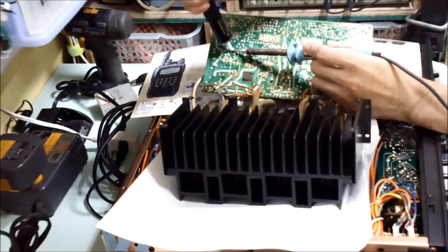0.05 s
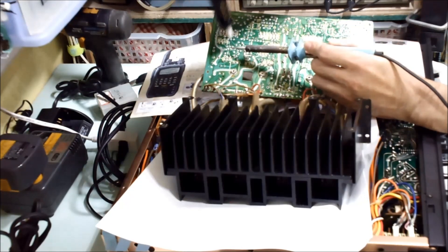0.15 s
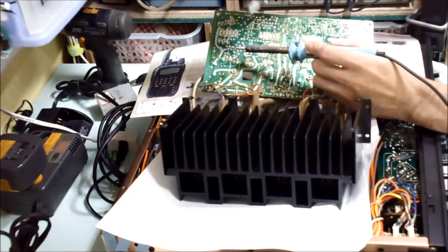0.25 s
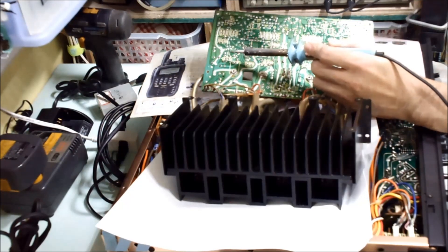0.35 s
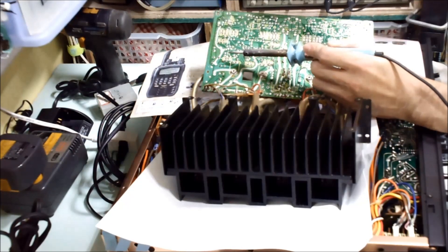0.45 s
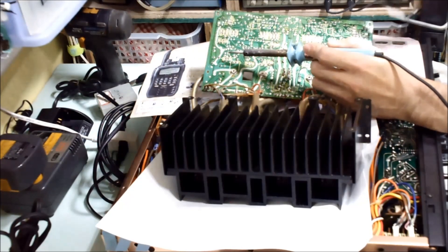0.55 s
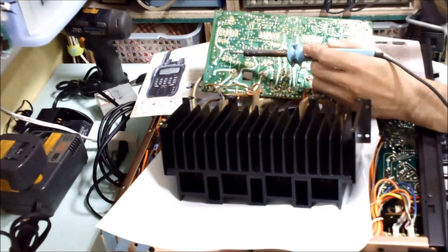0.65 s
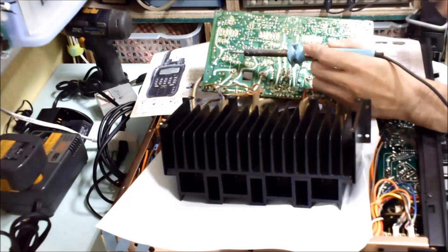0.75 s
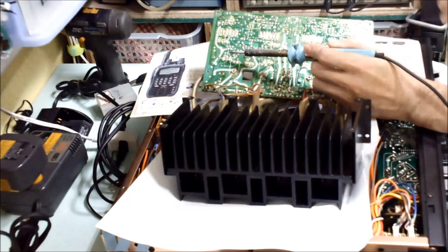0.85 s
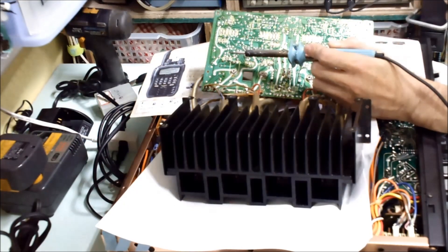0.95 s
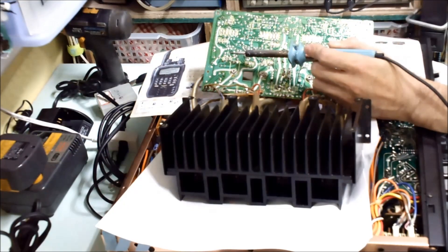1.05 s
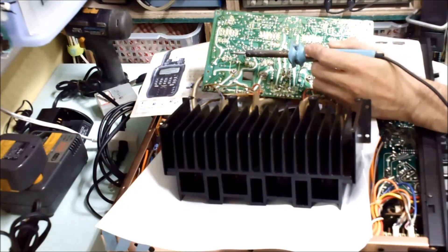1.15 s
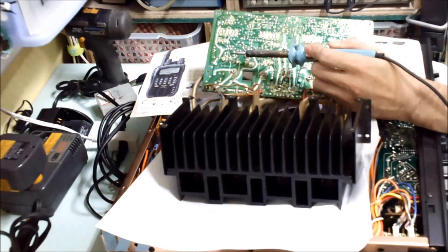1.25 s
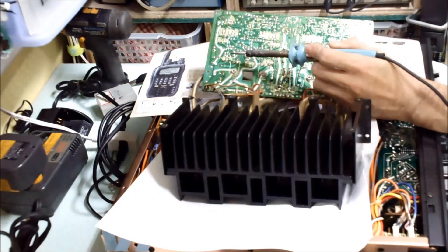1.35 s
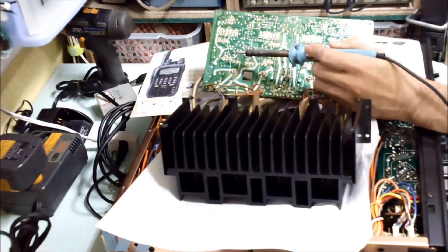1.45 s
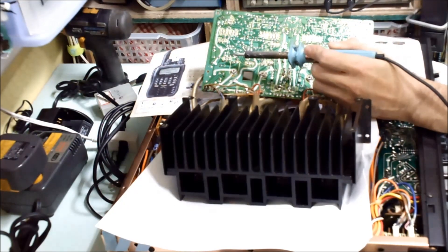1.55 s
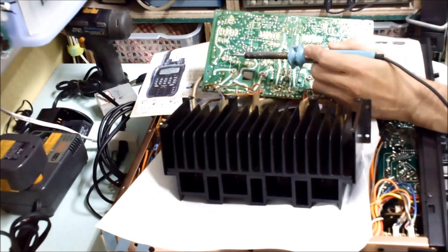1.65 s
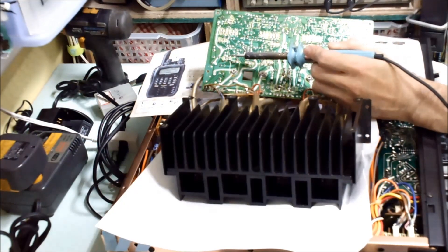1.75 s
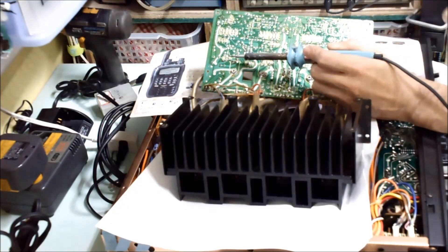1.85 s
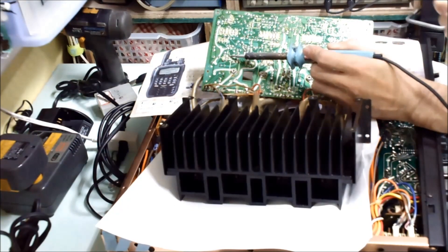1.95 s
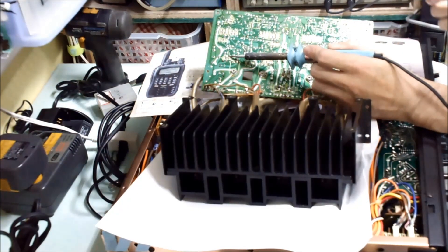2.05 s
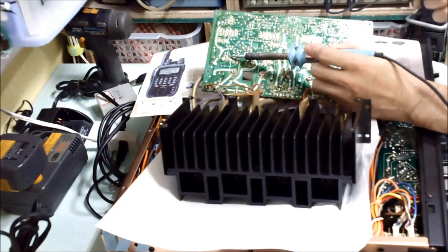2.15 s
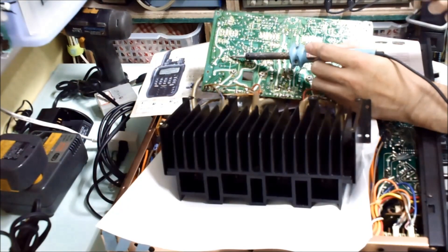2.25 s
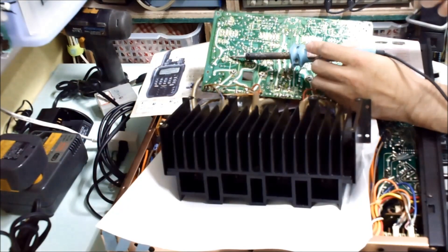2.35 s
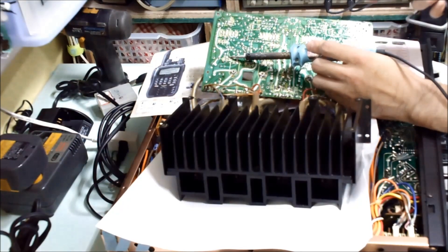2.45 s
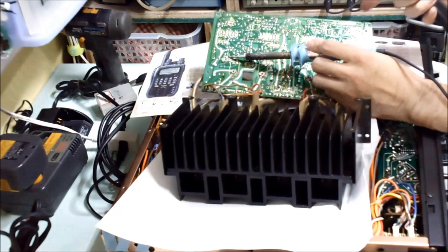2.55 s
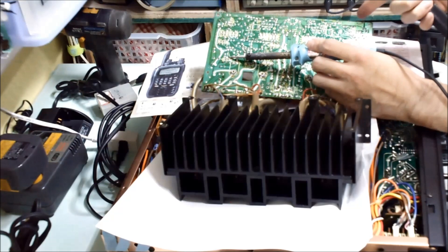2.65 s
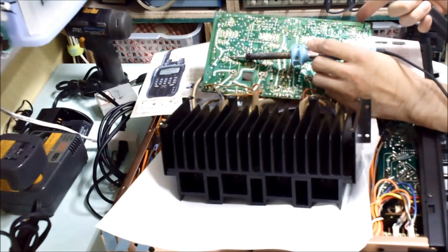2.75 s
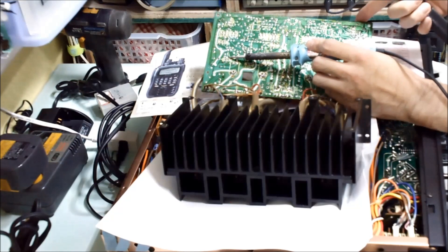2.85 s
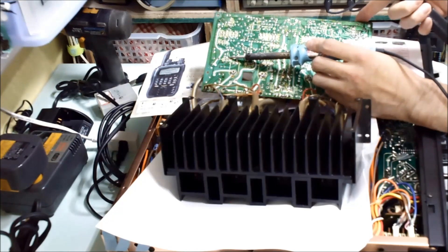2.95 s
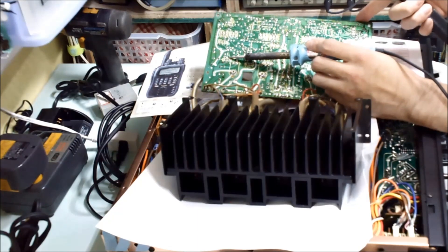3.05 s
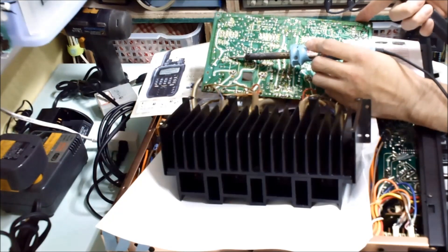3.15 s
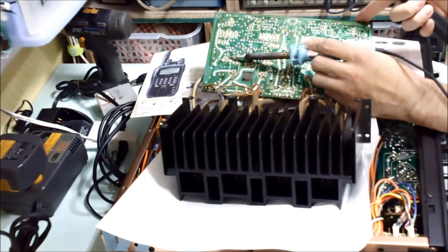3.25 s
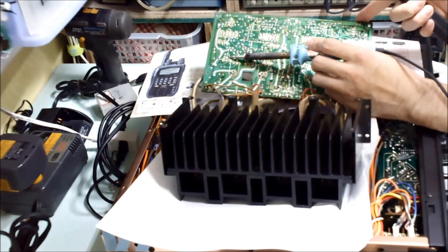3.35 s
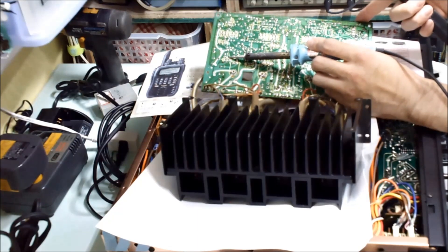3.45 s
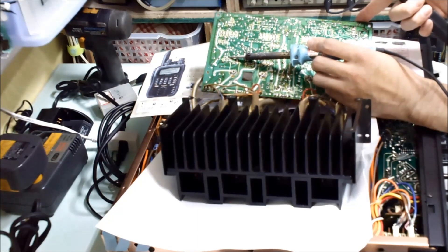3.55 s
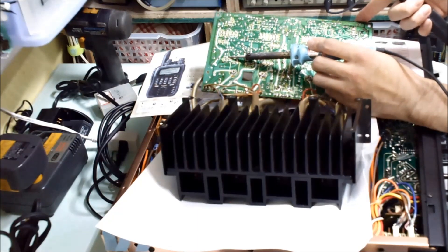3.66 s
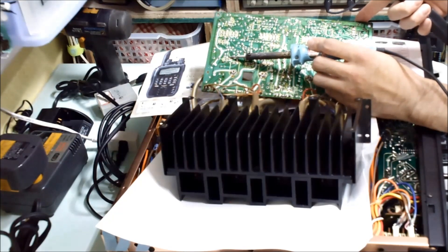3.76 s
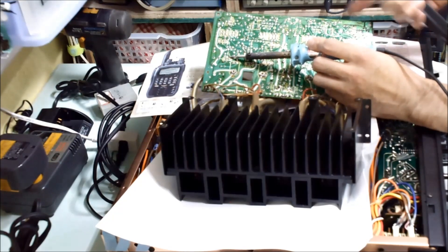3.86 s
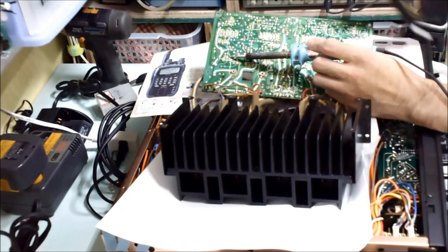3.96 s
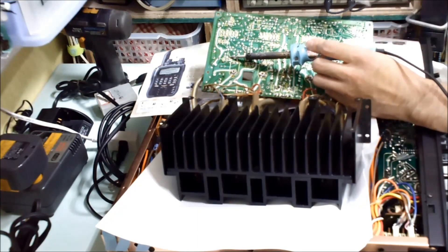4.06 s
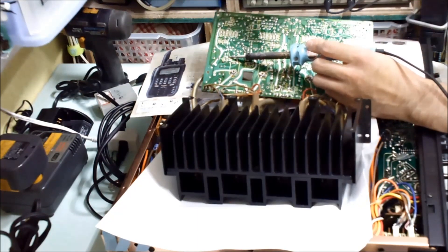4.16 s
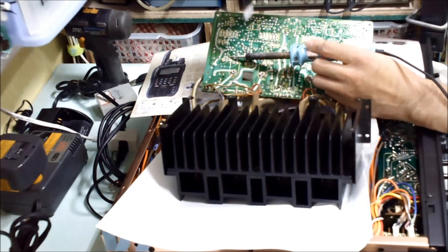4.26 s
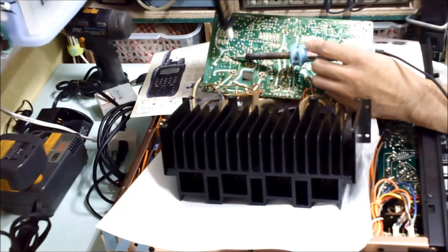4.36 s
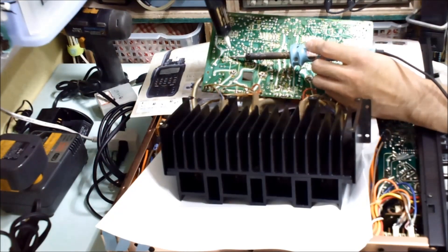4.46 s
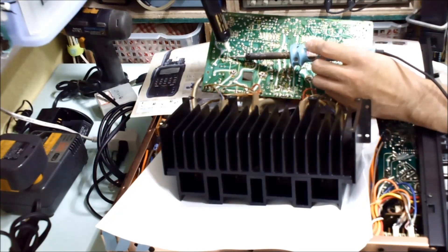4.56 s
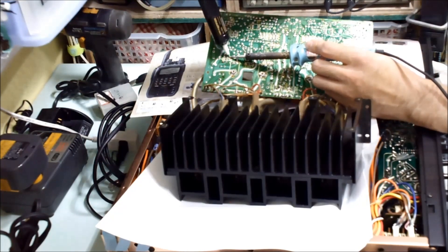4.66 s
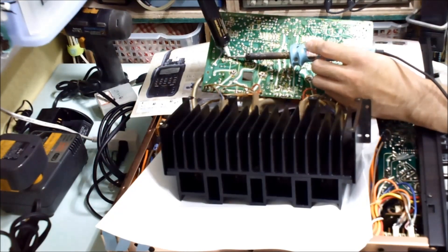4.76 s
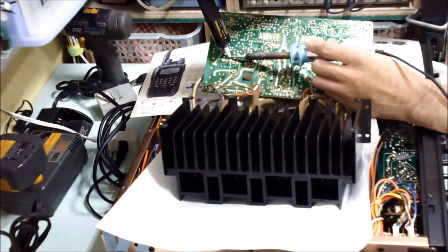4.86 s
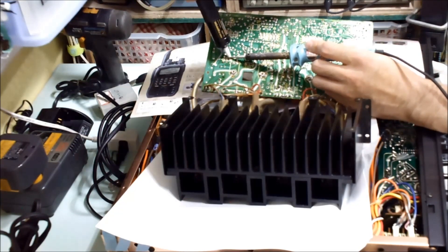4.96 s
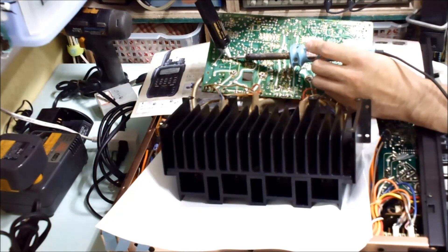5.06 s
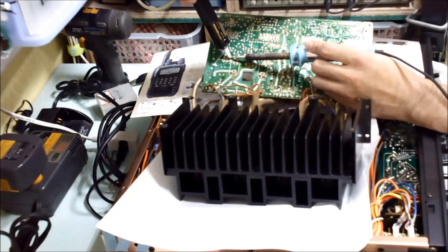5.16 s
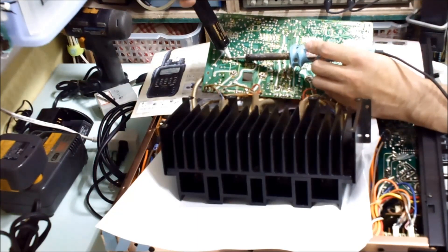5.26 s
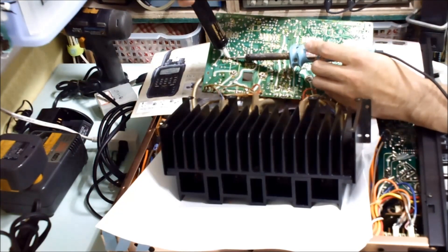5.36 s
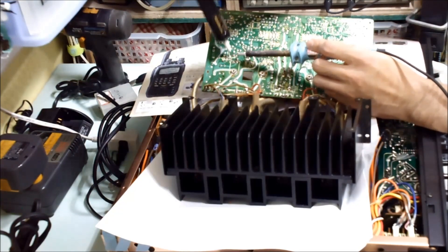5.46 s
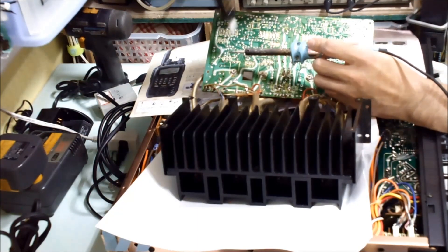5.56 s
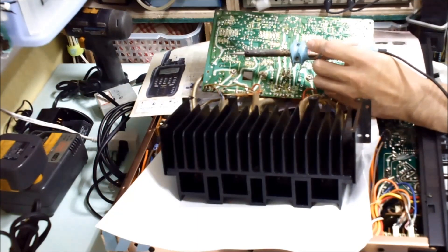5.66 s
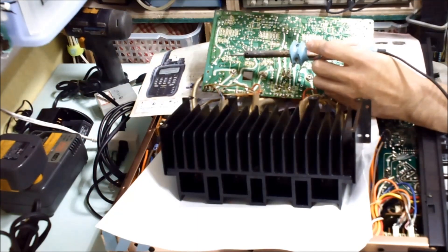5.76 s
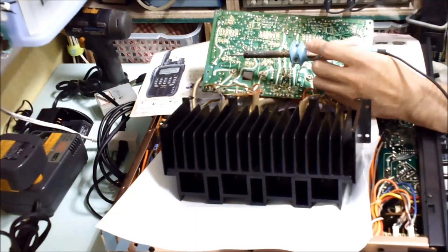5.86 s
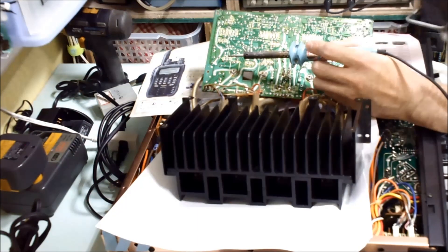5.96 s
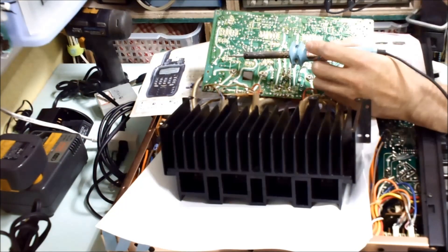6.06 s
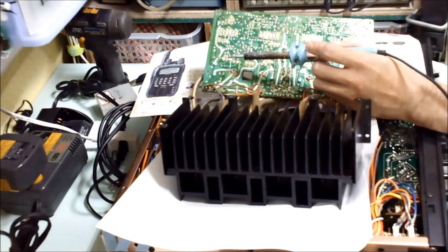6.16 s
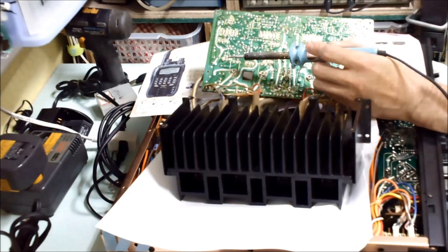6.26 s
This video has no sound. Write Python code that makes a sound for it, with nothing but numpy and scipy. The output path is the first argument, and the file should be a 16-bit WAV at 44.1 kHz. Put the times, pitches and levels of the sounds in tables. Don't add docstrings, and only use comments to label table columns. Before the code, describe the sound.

A spring-loaded hand pump fires with a hard snap, is pushed back until it latches and knocks the bench, then fires again after light taps and rubbing.

```python
import sys
import numpy as np
from scipy import signal
from scipy.fft import rfft, irfft
from scipy.io import wavfile
from scipy.ndimage import uniform_filter1d

SR = 44100
rng = np.random.default_rng(int(sys.argv[2]) if len(sys.argv) > 2 else 0)


def field_ratio(decibels):
    return 10 ** (np.asarray(decibels, dtype=float) / 20)


def log_audio(samples):
    frames = np.atleast_2d(samples).T
    limited = np.clip(frames, -1, 1)
    pcm = np.round(limited * 32767).astype(np.int16)
    wavfile.write(sys.argv[1], SR, pcm)


N = 277830

# (frequency [Hz], density [dB per Hz])
ROOM_SPECTRUM = [(12, -33), (20, -0.5), (44, 3), (70, 0.5), (248, -13), (485, -21.5), (2320, -33),
                 (3340, -33), (3950, -31.5), (4420, -24.5), (5380, -33), (6360, -36.5), (7730, -36.5),
                 (14700, -38), (16000, -35)]
# (frequency [Hz], width [Hz], level over top hiss [dB])
WHINE_BAND = (7900, 150, -12.5)
# (offset [s], level over top hiss [dB], share sounding [0-1])
LENS_STEPS = [
    (.0156, 25, .65),
    (.0168, 24.5, .5),
    (.0204, 26.5, .85),
]
FRAME_S = 1 / 30

DUCK_DEPTHS_DB = [
    6,
    10.5,
]
FULL_GAIN_DB = -71
DUCK_HOLD_S, CLIMB_STEP_DB, CLIMB_STEP_S = 0.51, 4.5, 0.19
NEAR_DB, NEAR_WAIT_S, CREEP_S = 4, 0.88, 0.9

# (peak time [s], level [dB], rise [s], fall [s])
HAND_RUBS = [(.75, -70, .15, .1), (.88, -67, .12, .2), (1.02, -67.5, .1, .2), (1.15, -69.5, .15, 0.18),
             (1.31, -65, .25, .06), (1.93, -57, .02, .2), (2.43, -61, 0.19, .2), (2.81, -68, .2, .4),
             (3.05, -66, .3, .13), (3.98, -59, 0.036, 0.12), (5.2, -71, .3, .4), (5.45, -59.5, .05, .01)]
# (frequency [Hz], density [dB per Hz])
RUB_SPECTRUM = [(350, -44.5), (600, -18), (733, -14.5), (1360, -17), (1410, -19.5), (2100, -10.5),
                (3380, -13), (4190, 3.5), (4750, 1.5), (7270, -21), (12000, -31), (15600, -62),
                (22000, -120)]
# (peak time [s], level [dB], rise [s], fall [s])
SLEEVE_SWELL = [(4.28, -56, 0.13, 0.66)]
# (frequency [Hz], density [dB per Hz])
SLEEVE_SPECTRUM = [(500, -37), (900, -22.5), (3300, -18.5), (4100, -11.5), (4450, -6), (4580, 2.5),
                   (4720, -9), (5300, -16), (6800, -27.5), (12000, -36.5)]
# (peak time [s], level [dB], rise [s], fall [s])
LOW_BREATHS = [(1.3, -70, .06, .07), (1.41, -62.5, .03, 0.14), (1.55, -73, .15, .4), (1.74, -71, .25, .06)]
# (peak time [s], level [dB], rise [s], fall [s])
HIGH_BREATHS = [(1.55, -73, 0.17, .2), (1.71, -59, .17, .25)]
PUSH_START_S, PUSH_END_S = 1.385, 1.745

# (time [s], peak level [dB], tilt from dull to bright [dB])
BOARD_TAPS = [(0.043, -45.5, -8.5), (0.2438, -30, -4.5), (0.2614, -44, -1), (0.2835, -40.5, -1),
              (0.7378, -46.5, -2), (0.819, -56.5, -7.5), (0.8594, -58, -3), (1.0114, -48.5, 1.5),
              (1.2026, -46, 1), (1.3813, -52, 2), (2.115, -47.5, -0.5), (2.3477, -48, -1), (2.3686, -46, 1),
              (2.4656, -43, 1), (2.5492, -49, -1), (2.6207, -50, -1), (2.72, -47, 3.5), (2.7826, -48, 3.5),
              (2.853, -49, 2.5), (3.3189, -48, 4), (3.8434, -51, 2), (3.9866, -33, 1.5), (5.0808, -34, 3),
              (5.3585, -47, -3), (5.391, -50, -8.5), (5.4177, -43, -2), (5.5822, -42, -2.5),
              (5.5923, -43, -2.5), (5.6294, -53, -1), (5.7694, -62.5, -6.5)]
# (frequency [Hz], density [dB per Hz])
TAP_SPECTRUM = [(210, -46), (350, -14.5), (1340, -13.5), (2500, -11), (2710, -9.5), (3180, -14),
                (4670, 0.5), (6130, -16.5), (8440, -28.5), (9140, -35), (16000, -41)]
# (time [s], peak level [dB], frequency [Hz], t60 [s])
BARREL_POPS = [
    (.821, -58, 1150, .06),
    (1.6, -62, 1330, .05),
    (1.771, -46, 598, .09),
    (1.826, -50, 1130, .035),
]

# (time [s], level [dB], rise [s], t60 [s])
KNOCK_CONTACTS = [
    (1.878, -31.5, 0.012, 0.068),
    (1.8915, -23, 0.00035, 0.03),
    (1.8965, -33, 0.00069, 0.016),
    (1.903, -40.5, .003, 0.15),
]
# (frequency [Hz], density [dB per Hz])
KNOCK_SPECTRUM = [(180, -43), (300, -35), (584, 2.5), (1230, -9), (2000, 7.5), (2740, -14.5), (2980, -5.5),
                  (3130, -13), (4230, 1), (6000, -14), (16000, -45)]
# (frequency [Hz], level [dB], t60 [s])
KNOCK_RESONANCES = [(450, -10.5, .05), (572, -11, 0.1), (1580, -12, .04), (1980, -19, .07),
                    (3120, -13, 0.09), (4200, -12, .04)]
# (time [s], level [dB], rise [s], t60 [s])
LATCH_CONTACTS = [
    (1.7385, -29.5, 0.00057, 0.012),
    (1.7400, -22, 0.00032, 0.013),
    (1.744, -42, .002, 0.144),
    (1.764, -49.5, .004, .1),
]
# (frequency [Hz], density [dB per Hz])
LATCH_SPECTRUM = [(820, -59), (1400, -26.5), (1730, -21), (1960, -3.5), (2280, -24), (3300, -11),
                  (4000, -21), (4760, -0.5), (6330, -25), (8950, -22), (15100, -52), (16000, -50)]
# (frequency [Hz], level [dB], t60 [s])
LATCH_RESONANCES = [(2000, -4.5, 0.052), (3270, -14, .04), (4800, -3, .1), (4900, -9, .1), (6600, -24, .04)]

# (frequency [Hz], level [dB], t60 [s])
BENCH_RESONANCES = [(54, -48, .45), (82.5, -53.5, .15), (130.5, -42, 0.15), (184, -49.5, 0.091)]
RECOIL_LEVELS_DB = [
    -.5,
    -5,
]
# (release time [s], flight [dB], stop [dB], bounce [dB], after-rattle [dB])
PUMP_SHOTS = [
    (.1016, -1.5, -4, .5, 3.5),
    (5.4544, 1, 2, -2.5, -2),
]
# (time after release [s], level [dB], rise [s], t60 [s])
FLIGHT_CONTACTS = [
    (0, -28, .0011, .036),
    (.0021, -18.5, .0005, .04),
    (.0056, -23.5, .0004, .035),
    (.0098, -23, .0008, .022),
]
# (time after release [s], level [dB], rise [s], t60 [s])
STOP = (0.0126, -14, 0.0002, 0.0048)
BOUNCE = (0.014, -11, 0.0006, 0.027)
AFTER_RATTLE = (0.0225, -24, 0.0025, 0.115)
# (frequency [Hz], density [dB per Hz])
SHOT_SPECTRA = [
    [(120, -59), (200, -31.5), (373, -16), (683, -29), (821, -12), (986, -28), (1350, -6.5), (1560, -15.5),
     (3190, -12), (3760, -13.5), (4520, 0.5), (9930, -30), (10900, -25), (16000, -55)],
    [(120, -54.5), (200, -19), (623, -21.5), (791, -14.5), (1210, -25), (1370, -11), (2860, -16.5),
     (3130, -9.5), (3430, -14.5), (4680, 0), (7410, -17.5), (9230, -30.5), (11500, -29.5), (16000, -58)],
]
# (frequency [Hz], level [dB], t60 [s])
SHOT_RESONANCES = [
    [(782, -9, 0.087), (1346, -12, 0.043), (3200, -12, .04), (4145, -5, .07), (4400, -5.5, 0.065),
     (4823, -7.5, .1), (5560, -9.5, .06)],
    [(780, -17, 0.035), (1350, -9, 0.084), (2050, -15.5, .04), (4360, -10.5, .1), (4650, -5.5, 0.12),
     (4735, -7, 0.09), (5020, -8.5, .07), (5400, -5, .05)],
]


def rms_one(x):
    return x / np.sqrt(np.mean(x ** 2) + 1e-30)


def colour(x, spectrum):
    hz, db = np.transpose(spectrum)
    size = 8192
    bins_hz = np.arange(size // 2 + 1) * SR / size
    gain = field_ratio(np.interp(np.log(bins_hz + 1), np.log(hz), db))
    cepstrum = irfft(np.log(gain))
    cepstrum[1:size // 2] *= 2
    cepstrum[size // 2 + 1:] = 0
    response = irfft(np.exp(rfft(cepstrum)))
    return signal.oaconvolve(x, response / np.linalg.norm(response))[:N]


def ring(x, hz, t60_s):
    radius = field_ratio(-60 / (t60_s * SR))
    w = 2 * np.pi * hz / SR
    return signal.lfilter([0, np.sin(w)], [1, -2 * radius * np.cos(w), radius ** 2], x + 1e-18)


def band(x, low_hz, high_hz):
    return signal.sosfilt(signal.butter(2, [low_hz, high_hz], "band", fs=SR, output="sos"), x)


def drift(rate_hz):
    knots = rng.standard_normal(int(N / SR * rate_hz) + 2)
    return np.interp(np.linspace(0, len(knots) - 1, N), np.arange(len(knots)), knots)


def burst(time_s, db, rise_s, t60_s):
    out = np.zeros(N)
    start = round(time_s * SR)
    t = np.arange(min(N - start, SR // 2)) / SR
    out[start:start + len(t)] = field_ratio(db - 60 * t / t60_s) * np.minimum(t / rise_s, 1)
    return out


def swells(rows):
    t = np.arange(N) / SR
    out = np.zeros(N)
    for peak_s, db, rise_s, fall_s in rows:
        down_db = 20 * np.maximum((peak_s - t) / rise_s, (t - peak_s) / fall_s)
        out += field_ratio(db - down_db) * (down_db < 30)
    return out


def hold(start_s, end_s, attack_s, release_s):
    t = np.arange(N) / SR
    closed = np.maximum((start_s + attack_s - t) / attack_s, (t - end_s) / release_s)
    return field_ratio(-20 * np.clip(closed, 0, 5))


def rattle(grain_db):
    return rms_one(rng.standard_normal(N) * field_ratio(grain_db * drift(900)))


def blow(contacts, impact, spectrum, modes, modes_db, grain_db):
    force = rattle(grain_db) * sum(burst(*row) for row in contacts)
    impact_s, impact_db = impact
    force[round(impact_s * SR)] += field_ratio(impact_db)
    rings = sum(field_ratio(db + 3 * drift(200)) * ring(force, hz, t60_s) for hz, db, t60_s in modes)
    return colour(force, spectrum) + field_ratio(modes_db) * rings


def gain_control():
    under_db = np.zeros(N)
    for shot, depth_db in zip(PUMP_SHOTS, DUCK_DEPTHS_DB):
        since_s = np.arange(N) / SR - shot[0] - BOUNCE[0]
        steps = np.maximum(np.ceil((since_s - DUCK_HOLD_S) / CLIMB_STEP_S), 0)
        home = np.clip(1 - (since_s - DUCK_HOLD_S - NEAR_WAIT_S) / CREEP_S, 0, 1)
        under_db += (since_s > 0) * np.maximum(depth_db - CLIMB_STEP_DB * steps, NEAR_DB) * home
    return field_ratio(FULL_GAIN_DB - uniform_filter1d(under_db, size=600))


def lens_drive():
    clicks = np.zeros(N + SR)
    frames_s = np.arange(0, N / SR, FRAME_S)
    for offset_s, db, share in LENS_STEPS:
        level, sounding, jitter = rng.random((len(frames_s), 3)).T
        at = np.round((frames_s + offset_s + 0.0006 * (jitter - 0.5)) * SR).astype(int)
        clicks[at] += field_ratio(db + 8 * (level - 0.5)) * (sounding < share)
    clicks[33:] += 0.35 * clicks[:-33]
    body = signal.cheby1(4, 2, [3750, 5750], "band", fs=SR, output="sos")
    return field_ratio(17.5) * signal.sosfilt(body, clicks[:N])


def background():
    hz, width_hz, db = WHINE_BAND
    noise = field_ratio(19.5 + 0.5 * drift(6)) * colour(rng.standard_normal(N), ROOM_SPECTRUM)
    whine = field_ratio(db) * rms_one(band(rng.standard_normal(N), hz - width_hz / 2, hz + width_hz / 2))
    return gain_control() * (noise + whine + lens_drive())


def workshop(x):
    t60_s, first_echo_s = 0.25, 0.006
    t = np.arange(SR // 2) / SR
    echoes = rng.standard_normal(len(t)) * field_ratio(-60 * t / t60_s) * (t > first_echo_s)
    return band(signal.oaconvolve(x, echoes / np.linalg.norm(echoes))[:N], 200, 11000)


def sleeve_brush():
    level = swells(SLEEVE_SWELL) * hold(0, 4.62, 0.01, 0.16)
    return level * colour(rng.standard_normal(N), SLEEVE_SPECTRUM)


def friction():
    push = field_ratio(-57.5) * hold(PUSH_START_S, PUSH_END_S, 0.011, 0.14)
    push += swells([(PUSH_END_S - 0.01, -55, 0.2, 0.04)])
    level = field_ratio(3.5 * drift(60)) * swells(HAND_RUBS) + field_ratio(1.8 * drift(70)) * push
    grit = rattle(2.2)
    seal_hiss = field_ratio(-19) * push * rms_one(band(grit, 6200, 9200))
    return level * colour(grit, RUB_SPECTRUM) + seal_hiss


def air(hz, width_hz, rows):
    flutter = drift(width_hz) + 1j * drift(width_hz)
    carrier = np.exp(2j * np.pi * np.cumsum(hz * np.ones(N)) / SR)
    return swells(rows) * np.real(flutter * carrier)


def barrel_air():
    open_hz, cocked_hz, overtone = 1144, 620, 3.1
    period_s = np.interp(np.arange(N) / SR, [PUSH_START_S, PUSH_END_S], [1 / open_hz, 1 / cocked_hz])
    low = air(1 / period_s, 130, LOW_BREATHS)
    high = air(overtone / period_s, 260, HIGH_BREATHS)
    return low + high + air(2160, 400, [(1.97, -62, 0.18, 0.32)])


def taps():
    tail_t60_s, crack_t60_s, crack_db = 0.095, 0.012, 1.5
    dull, bright, edges = np.zeros((3, N))
    for time_s, db, tilt in BOARD_TAPS:
        bright_db = db - 10.5 + tilt
        dull += burst(time_s, db - 6.5 - tilt, 0.0006, tail_t60_s)
        bright += burst(time_s, bright_db, 0.0006, tail_t60_s)
        bright += burst(time_s, bright_db + crack_db, 0.0003, crack_t60_s)
        edges[round(time_s * SR)] = field_ratio(db + 8.5 + min(tilt, 0))
    low = signal.sosfilt(signal.butter(2, 3200, fs=SR, output="sos"), dull * rattle(1.8))
    high = signal.sosfilt(signal.butter(2, 3200, "high", fs=SR, output="sos"), bright * rattle(1.9))
    return colour(low + high + edges, TAP_SPECTRUM) + field_ratio(-28) * band(edges + 3 * high, 5800, 9000)


def pops():
    t = np.arange(N) / SR
    return sum(burst(time_s, db + 4, 0.005, t60_s) * np.sin(2 * np.pi * hz * t)
               for time_s, db, hz, t60_s in BARREL_POPS)


def knock():
    return blow(KNOCK_CONTACTS, (1.8915, -6.5), KNOCK_SPECTRUM, KNOCK_RESONANCES, modes_db=-30.5, grain_db=1.0)


def latch():
    return blow(LATCH_CONTACTS, (1.7385, -9), LATCH_SPECTRUM, LATCH_RESONANCES, modes_db=-35, grain_db=0.0)


def bench_thump():
    recoil_s = 0.0032
    push = sum(burst(shot[0] + recoil_s, db, 0.0028, 0.0068)
               for shot, db in zip(PUMP_SHOTS, RECOIL_LEVELS_DB))
    return field_ratio(-24.5) * sum(field_ratio(db + 17.5) * ring(push, hz, t60_s) for hz, db, t60_s in BENCH_RESONANCES)


def firing(shot, spectrum, modes):
    release_s, flight_db, *rest_db = shot
    rows = FLIGHT_CONTACTS + [STOP, BOUNCE, AFTER_RATTLE]
    extra_db = [flight_db] * len(FLIGHT_CONTACTS) + rest_db
    contacts = [(release_s + late_s, db + more_db, rise_s, t60_s)
                for (late_s, db, rise_s, t60_s), more_db in zip(rows, extra_db)]
    return blow(contacts, (release_s + STOP[0], 6.5), spectrum, modes, modes_db=-36.5, grain_db=2.5)


def scene():
    shots = sum(firing(*shot) for shot in zip(PUMP_SHOTS, SHOT_SPECTRA, SHOT_RESONANCES))
    pump = shots + latch() + knock() + bench_thump()
    touches = taps() + pops()
    hands = friction() + sleeve_brush() + barrel_air()
    bench = pump + touches + hands
    return (bench + field_ratio(-21) * workshop(bench) + background())[None]


def band_limit(x):
    return signal.sosfilt(signal.butter(12, 16520, fs=SR, output="sos"), x)


def record(dry):
    cutoff_hz = 15800
    top_cut = signal.cheby2(14, 80, cutoff_hz + 700, fs=SR, output="sos")
    rounded = 2 * np.tanh(dry / 2)
    return band_limit(signal.sosfilt(top_cut, rounded))


dry = scene()
out = record(dry)
log_audio(out)
```